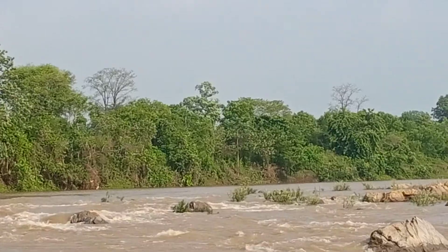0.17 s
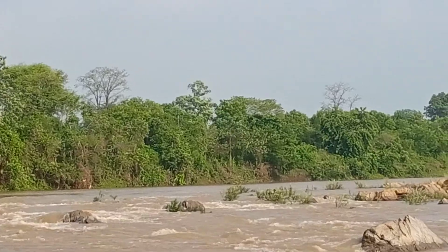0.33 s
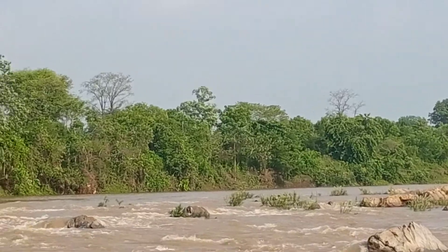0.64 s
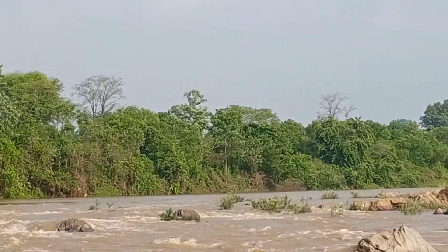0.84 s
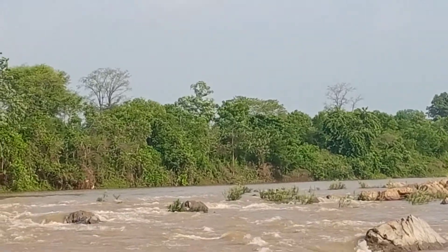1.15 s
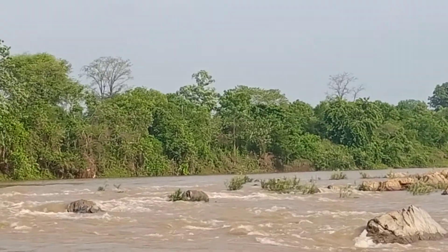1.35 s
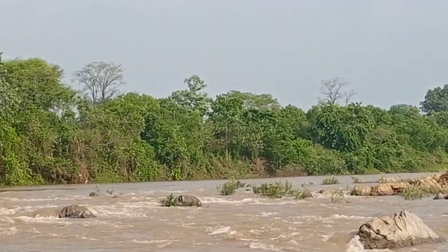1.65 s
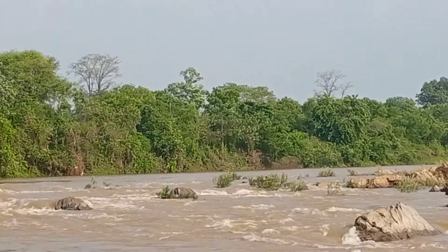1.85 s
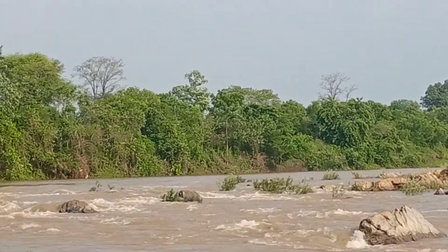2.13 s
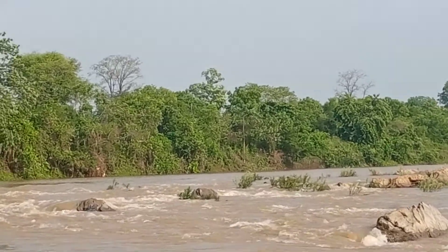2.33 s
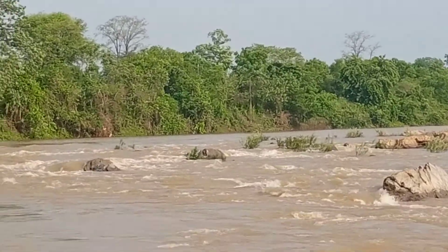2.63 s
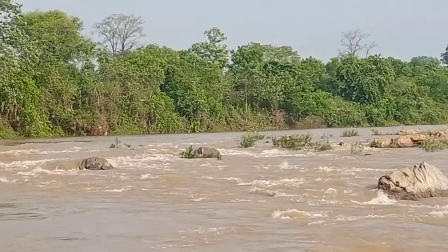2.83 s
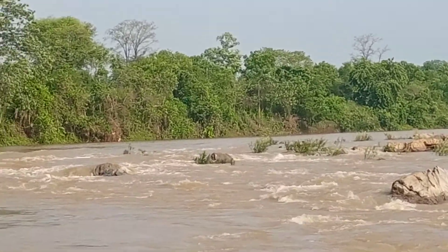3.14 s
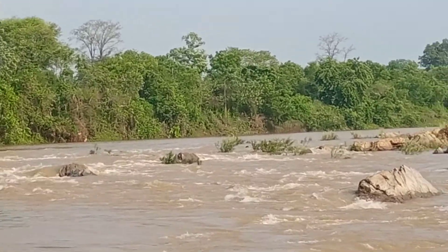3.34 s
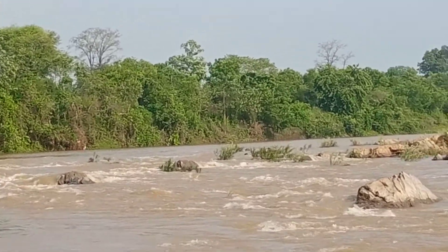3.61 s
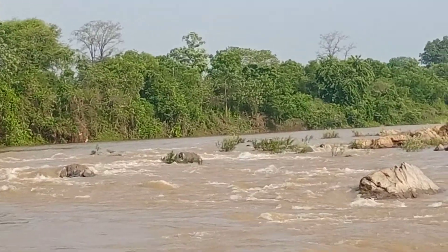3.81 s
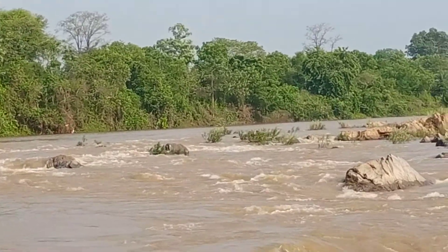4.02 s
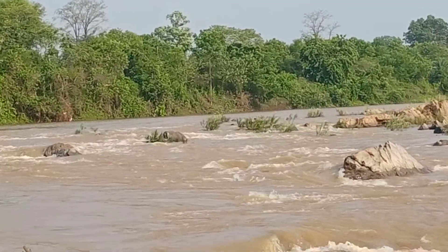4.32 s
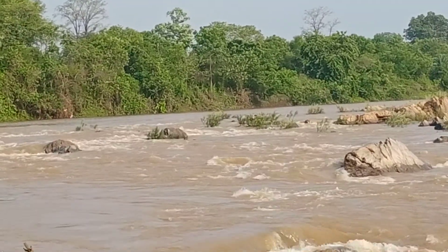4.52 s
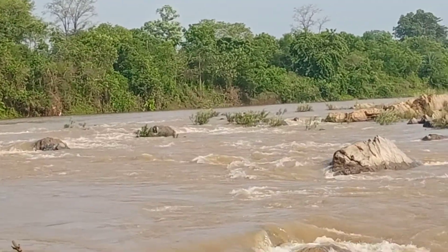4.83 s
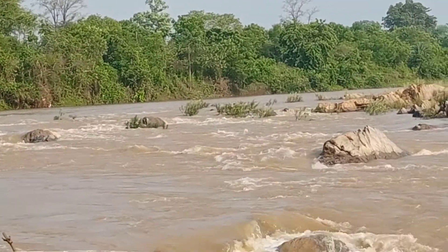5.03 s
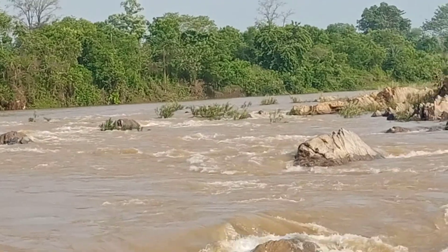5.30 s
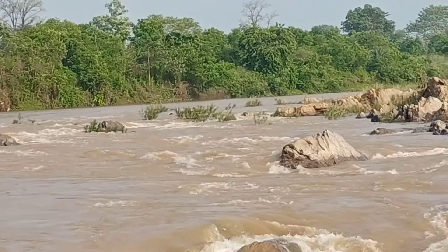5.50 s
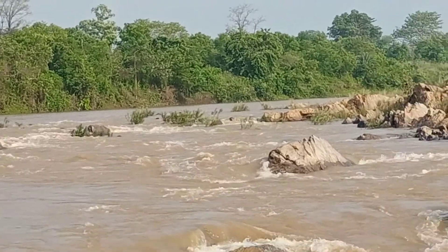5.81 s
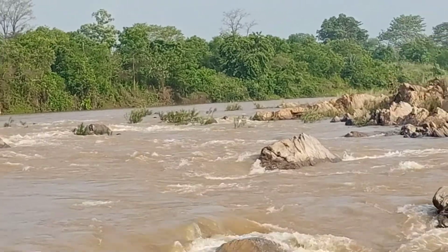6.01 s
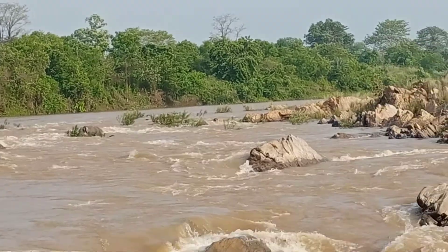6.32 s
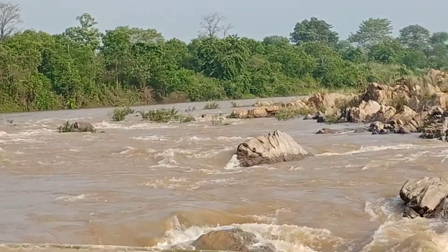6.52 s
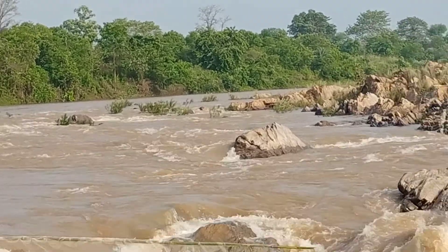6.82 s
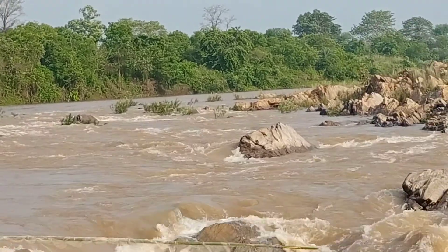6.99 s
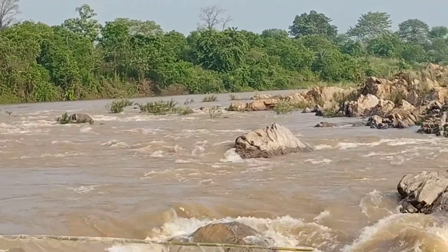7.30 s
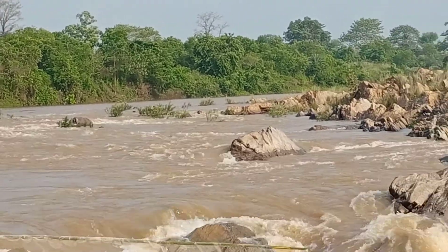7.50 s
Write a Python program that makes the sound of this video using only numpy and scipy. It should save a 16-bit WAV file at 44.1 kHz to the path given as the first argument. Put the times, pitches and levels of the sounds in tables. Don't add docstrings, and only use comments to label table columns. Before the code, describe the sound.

Steady white water, a dense wash of bursting bubbles over a low roar, fills the outdoor scene. Short soft wind puffs strike the phone microphone irregularly. The river turns closer and fuller midway, surging gently. One small dry click falls shortly after five seconds. Finally strong, rounded wind thumps dominate, overloading slightly and pushing the river back. The treble is limited.

```python
import sys
import numpy as np
from scipy import signal
from scipy.fft import rfft, irfft, next_fast_len
from scipy.io import wavfile
from scipy.ndimage import uniform_filter1d, map_coordinates

SR = 44100
rng = np.random.default_rng(int(sys.argv[2]) if len(sys.argv) > 2 else 0)


def gain_from_db(level_db):
    decades = np.asarray(level_db, float) / 20
    return 10 ** decades


def unload_wav(signal):
    wavfile.write(
        sys.argv[1],
        SR,
        np.round(np.clip(np.atleast_2d(signal).T, -1, 1) * 32767).astype(np.int16),
    )


N = 337541


def unit(x):
    return x / np.sqrt(np.mean(x ** 2) + 1e-20)


def steady(x, span):
    power = uniform_filter1d(x ** 2, int(span * SR))
    return unit(x / np.sqrt(np.abs(power) + .05))


def curve(rows):
    seconds, values = np.transpose(rows)
    return np.interp(np.arange(N) / SR, seconds, values)


def wobble(rate):
    knots = rng.standard_normal(1000)
    return map_coordinates(knots, [np.arange(N) * min(rate, 100) / SR])


def coloured(x, spectrum):
    size = next_fast_len(N + 8192)
    hz, db = np.transpose(spectrum)
    bins_hz = np.fft.rfftfreq(size, 1 / SR) + 1
    gain_db = np.interp(np.log(bins_hz), np.log(hz), db, left=-120)
    return unit(irfft(rfft(x, size) * gain_from_db(gain_db), size)[:N])


def air():
    # (time [s], level [dB])
    breeze_points = [(0, -34.5), (.3, -38.5), (.7, -33.5), (1.35, -33.5), (1.6, -37.5), (1.75, -30),
                     (2.25, -35), (2.35, -40), (2.55, -31.5), (2.8, -34.5), (3.5, -34.5), (4.1, -36.5),
                     (4.4, -32.5), (5.3, -33.5), (5.42, -36.5), (6, -32), (6.42, -38), (7.65, -23)]
    # (start [s], hold [s], strength [dB], brightness [dB])
    gusts = [(0.394, 0.052, -18, -4.5), (0.587, .02, -27.5, -0.5), (0.763, .03, -30.5, -4.5),
             (0.886, .14, -25.5, 2.5), (1.058, 0.25, -36.5, 4), (1.726, 0.035, -22.5, 2.5),
             (1.862, 0.036, -24, -4), (1.972, .09, -19, -2.5), (2.132, .1, -25.5, -9),
             (2.43, .03, -31, 1.5), (2.859, .04, -30.5, 6), (2.988, .06, -26, -1), (3.085, .07, -20, -7),
             (4.206, .1, -29, 0.5), (4.444, .05, -27, 6), (4.545, .23, -29, -0.5), (4.815, 0.082, -28, 5.5),
             (5.052, 0.031, -18.5, -2), (5.145, .06, -27.5, 5.5), (5.991, .04, -27.5, -1.5),
             (5.656, .08, -28.5, -3), (6.198, .13, -26.5, -4.5), (6.505, .2, -20, 4), (6.756, .17, -16, 3),
             (6.977, .04, -20, -5), (7.061, .03, -23.5, -2), (7.192, 0.056, -22.5, -3.5),
             (7.284, .13, -20, 0), (7.465, .04, -14.5, -3.5), (7.574, .08, -15.5, -1)]
    rise_db_s, fall_db_s = 900, 500
    t = np.arange(N) / SR
    breeze_db = curve(breeze_points)
    bright_breeze_db = -26.5 + 0.24 * (breeze_db - breeze_db.mean())
    low_power = gain_from_db(breeze_db + 3.5 * wobble(14)) ** 2
    high_power = gain_from_db(bright_breeze_db + 1.4 * wobble(15)) ** 2
    for start, hold, strength_db, bright_db in gusts:
        rise_db = rise_db_s * np.maximum(start - t, 0)
        fall_db = fall_db_s * np.maximum(t - start - hold, 0)
        gust_db = strength_db - rise_db - fall_db
        low_power = low_power + gain_from_db(2 * gust_db)
        high_power = high_power + gain_from_db(2 * (gust_db + bright_db))
    return np.sqrt(low_power), np.sqrt(high_power)


def buffet(low_gain, high_gain):
    # (frequency [Hz], level [dB])
    rumble_colour = [(10, -10.5), (30, -6), (50, -5), (80, 4.5), (110, 7), (160, 5.5), (240, -4.5),
                     (350, -49)]
    flutter_colour = [(130, -44.5), (200, 4), (330, -0.5), (450, -8.5), (700, -19), (1100, -54.5)]
    rumble = steady(coloured(rng.standard_normal(N), rumble_colour), 0.051)
    flutter = steady(coloured(rng.standard_normal(N), flutter_colour), 0.025)
    lumps = gain_from_db(1.5 * wobble(25) - 2)
    return lumps * (low_gain * rumble + gain_from_db(-3.5) * high_gain * flutter)


def eddies(rows):
    out = np.zeros(N)
    reach = SR // 10
    t = np.arange(-reach, reach) / SR
    phases = rng.uniform(-1.5, 1, len(rows))
    for (s, db, hz, cycles), phase in zip(rows, phases):
        swell = np.exp(-(t * hz / cycles) ** 2)
        push = gain_from_db(db - 3) * swell * np.cos(2 * np.pi * hz * t + phase)
        at = round(s * SR) + np.arange(len(t)) - reach
        inside = (at >= 0) & (at < N)
        out[at[inside]] += push[inside]
    return out


def small_eddies(gain):
    count = 70
    when, weakness, pitch, life = rng.uniform(0, 1, (count, 4)).T
    wind_db = 20 * np.log10(gain)
    gust_db = wind_db[(when * N).astype(int)] - wind_db.mean()
    db = -20 + 0.4 * gust_db - 6 * weakness
    hz = 222 * 2 ** (1.6 * pitch - .8)
    cycles = 0.9 * 2 ** (1.5 * life - .6)
    return list(zip(when * N / SR, db, hz, cycles))


def port(wind):
    bent = wind + 0.46 * wind ** 2
    bass_cut = [(10, -31.5), (25, -20), (40, -14.5), (60, -4.5), (90, -2), (20000, -2)]
    return coloured(bent, bass_cut) * bent.std()


def gusty_wind():
    # (time [s], peak [dB], pitch [Hz], half length [cycles])
    light_eddies = [(.243, -11, 304, 0.82), (.411, -12.5, 124, .61), (.443, -18.5, 150.5, 0.56),
                    (.6, -12, 163, .96), (.936, -12.5, 181, 1.46), (.976, -20.5, 164.5, 1.6),
                    (.997, -8.5, 282, .88), (1.552, -11, 229, 0.56), (1.682, -14.5, 301, 3.3),
                    (1.738, -8.5, 192, .66), (1.877, -15, 279, 2.2), (1.933, -12, 135.7, 0.56),
                    (2.001, -15.5, 211, .8), (2.024, -9, 153, 0.9), (2.127, -14.5, 169.4, 1.1),
                    (2.161, -12, 178, 0.97), (2.216, -12.5, 137, 1.4), (2.738, -13.5, 328, 1.3),
                    (3.001, -13, 181, .6), (3.11, -12, 152.5, 2.6), (4.462, -9.5, 275, 0.99),
                    (4.75, -14, 275, 1.4), (5.048, -13.5, 201, .88), (5.062, -17, 199, 0.46),
                    (5.1, -10.5, 300, 0.97), (5.149, -12, 362, 1), (5.179, -15.5, 191, 1.35),
                    (5.682, -14.5, 247, .95), (5.786, -10, 235, 1), (6.2, -11.5, 300, 0.7)]
    # (time [s], peak [dB], pitch [Hz], half length [cycles])
    squall_eddies = [(6.51, -19, 105.3, 1.1), (6.521, -9.5, 240, .9), (6.546, -15, 498, 2),
                     (6.55, -9.5, 236, 5), (6.584, -6, 209, .48), (6.617, -13, 168, .51),
                     (6.665, -6.5, 255, .95), (6.694, -7, 167.4, .79), (6.702, -16.5, 326, 2.9),
                     (6.726, -13, 233, 1.1), (6.767, -13, 177.4, 2.3), (6.784, -12.5, 604, 1.8),
                     (6.786, -3, 370, 1.1), (6.82, 0.5, 202, .8), (6.856, -6, 166, 1.26),
                     (6.893, -11.5, 124, 1.5), (6.896, -6.5, 265.5, 2.6), (6.903, -19, 469, 1.5),
                     (6.926, -6, 231, .51), (6.956, -7, 136, .7), (7.208, -14.5, 115.6, .67),
                     (7.224, -6, 190, .59), (7.287, -3.5, 192, .63), (7.306, 1, 208, .55),
                     (7.367, -4.5, 194, .98), (7.402, -7, 206, 3), (7.477, -8, 118, 2.2),
                     (7.592, -11.5, 538, 1.7), (7.589, -9, 323, .85), (7.6, -14.5, 90, 1.1)]
    low, high = air()
    thumps = eddies(light_eddies) + eddies(squall_eddies) + eddies(small_eddies(high))
    return port(buffet(low, high) + thumps)


def churn(patchy_db, drift_db):
    z = signal.stft(rng.standard_normal(N), nperseg=512)[2]
    chance = rng.standard_normal((2,) + z.shape)
    patches = uniform_filter1d(uniform_filter1d(chance[0], size=4, axis=0), size=8, axis=1)
    drifts = uniform_filter1d(uniform_filter1d(chance[1], size=3, axis=0), size=60, axis=1)
    gain = gain_from_db(patchy_db * unit(patches) + drift_db * unit(drifts))
    return signal.istft(z * gain, nperseg=512)[1][:N]


def deep_roar(near, surge_db):
    # (frequency [Hz], level [dB])
    roar_colour = [(41, -34.5), (70, -23.5), (124, -6), (199, -4), (231, -5.5), (343, -4), (444, -14),
                   (624, -3.5), (864, -4), (1000, -9.5), (1090, -7), (1640, -5.5), (1800, -8), (2340, -25),
                   (3960, -120)]
    level_db = -25.5 + 0.56 * surge_db + 2 * near
    return gain_from_db(level_db) * coloured(churn(patchy_db=1.6, drift_db=0.85), roar_colour)


def fizz_level(near, surge_db):
    far_db, near_db, grows_db_s, follows = -14.5, -19, 0.35, 0.57
    shade_db, shade_ends_s, shade_fade_s = -1.5, 0.37, .05
    t = np.arange(N) / SR
    facing_db = far_db + (near_db - far_db) * near
    hand_db = shade_db / 2 * (1 - np.tanh((t - shade_ends_s) / shade_fade_s))
    return facing_db + grows_db_s * t + (follows - 1) * surge_db + 0.63 * wobble(7) + hand_db


def bright_spray(near, flow_db, surge_db):
    # (frequency [Hz], level [dB])
    far_colour = [(940, -36.5), (1600, -24), (1710, -11.5), (2030, 3), (2330, -3), (2600, 4), (2970, -4),
                  (3810, -10.5), (4280, -23), (4640, -21.5), (5160, -27), (5830, -22.5), (6360, -28.5),
                  (7380, -25.5), (8000, -33), (10400, -66.5), (17600, -120)]
    near_colour = [(940, -18.5), (1600, -13.5), (1950, 0), (2550, -0.5), (2990, -6.5), (3330, -9),
                   (3840, -17.5), (4190, -14), (4700, -16), (6240, -29.5), (6990, -27.5), (8000, -40),
                   (10400, -66.5), (17600, -120)]
    far_water = coloured(churn(patchy_db=1.26, drift_db=0.9), far_colour)
    near_water = coloured(churn(patchy_db=1.53, drift_db=0.66), near_colour)
    spray = np.sqrt(1 - near) * far_water + np.sqrt(near) * near_water
    body = signal.sosfiltfilt(signal.butter(4, 3800, fs=SR, output="sos"), spray)
    fizz = gain_from_db(fizz_level(near, surge_db)) * steady(spray - body, 1.1)
    return gain_from_db(flow_db + 0.16 * wobble(7.5)) * (body + fizz)


def river():
    # (time [s], share [0-1])
    turn_points = [(0, 0.2), (.3, 0.1), (.55, 0.1), (1.5, 0.04), (2.22, 0.3), (2.36, 0.4), (3.2, 0.79),
                   (4, 0.86), (5, 0.93), (6.5, 0.8), (7.65, 0.82)]
    # (time [s], level [dB])
    flow_points = [(0, -27), (.08, -23.5), (.5, -21), (.66, -22.5), (.82, -20.5), (1.0, -20.5),
                   (1.34, -23.5), (1.62, -19.5), (1.8, -20), (1.9, -21), (3.4, -22), (5.3, -22), (5.8, -20),
                   (6.1, -21.5), (6.75, -22.5), (7.2, -22.5), (7.29, -19.5), (7.4, -23)]
    near = np.clip(curve(turn_points), 0, 1)
    flow_db = curve(flow_points)
    surge_db = flow_db - flow_db.mean()
    return bright_spray(near, flow_db, surge_db) + deep_roar(near, surge_db)


def scene():
    return (gusty_wind() + river())[None]


def duck(x):
    at_s, depth_db, fall_s, sink_db_s = 6.78, -3.5, 0.065, -1
    after = np.maximum(np.arange(N) / SR - at_s, 0)
    return x * gain_from_db(depth_db * (1 - np.exp(-after / fall_s)) + sink_db_s * after)


def roll_off(x):
    return signal.sosfilt(signal.butter(12, 15900, fs=SR, output="sos"), x)


def record(dry):
    # (frequency [Hz], level [dB])
    band_limit = [(10, 3.5), (7900, -3.5), (8200, -9), (8450, -25), (8650, -55.5), (8800, -69.5),
                  (22000, -73)]
    # (time [s], level [dB])
    ticks = [
        (.0005, -40),
        (.018, -57),
        (.0255, -48),
        (.031, -59),
        (.036, -61),
        (.058, -59),
        (.087, -60),
        (5.1849, -26),
        (7.6535, -45),
    ]
    ceiling = .87
    ducked = duck(dry[0])
    ducked = ducked / (1 + np.abs(ducked / ceiling) ** 6) ** (1 / 6)
    wet = coloured(ducked, band_limit)[None] * ducked.std()
    for s, db in ticks:
        wet[:, min(round(s * SR), N - 1)] += gain_from_db(db)
    return roll_off(wet)


dry = scene()
out = record(dry)
unload_wav(out)
```